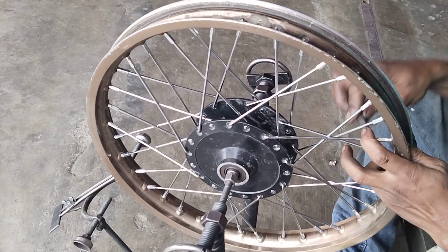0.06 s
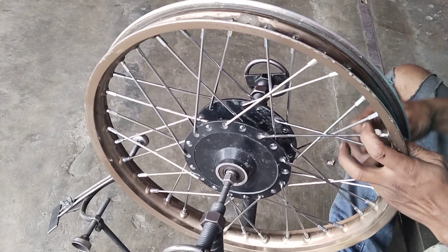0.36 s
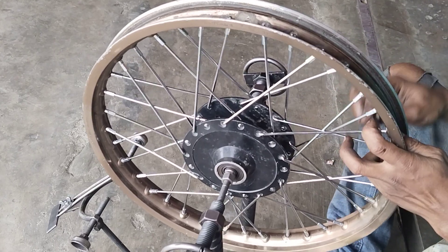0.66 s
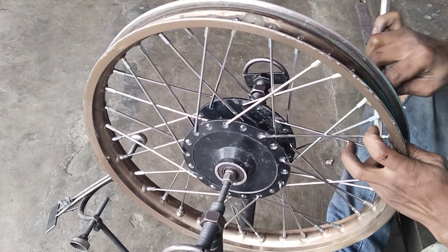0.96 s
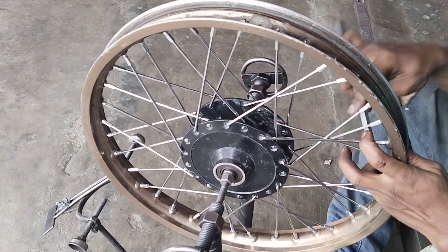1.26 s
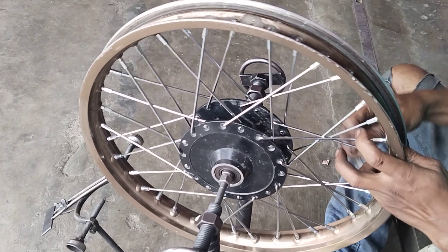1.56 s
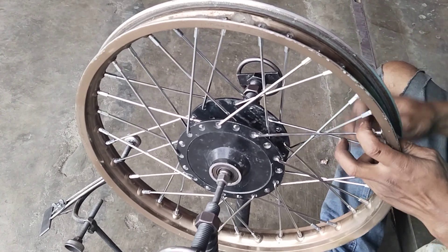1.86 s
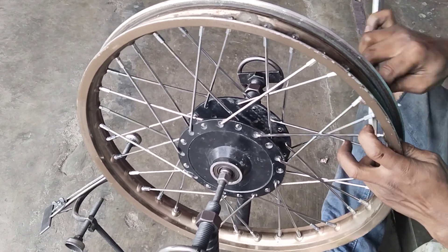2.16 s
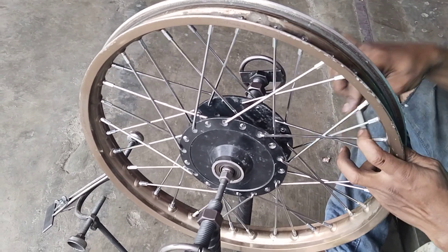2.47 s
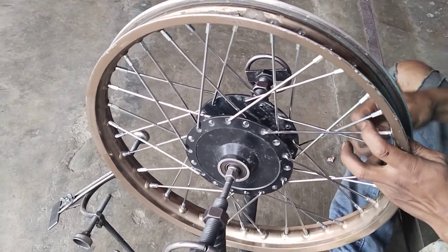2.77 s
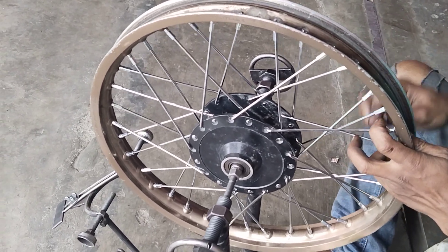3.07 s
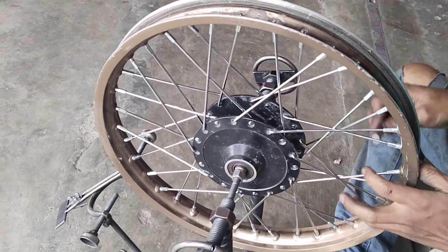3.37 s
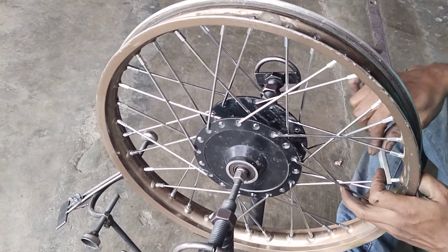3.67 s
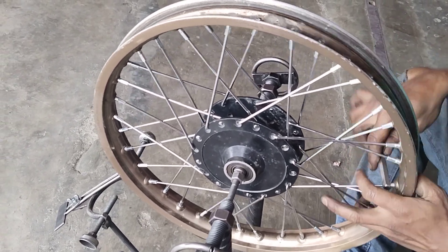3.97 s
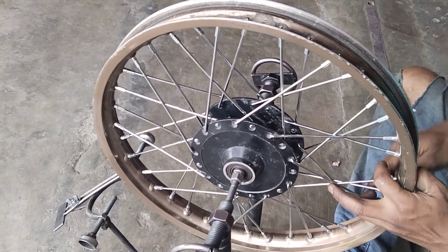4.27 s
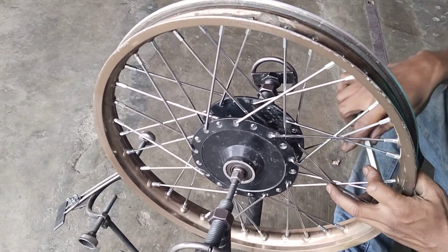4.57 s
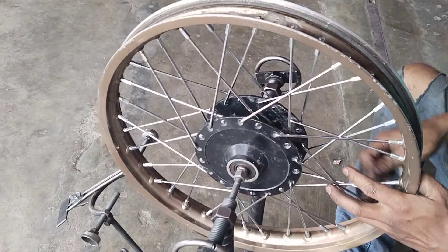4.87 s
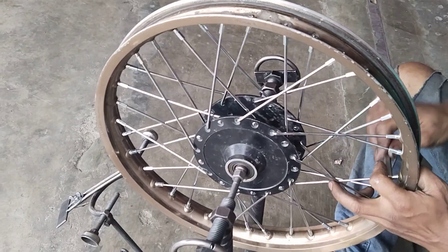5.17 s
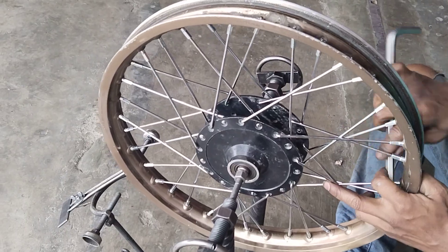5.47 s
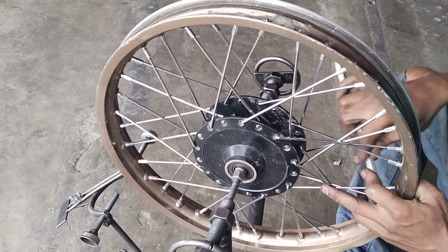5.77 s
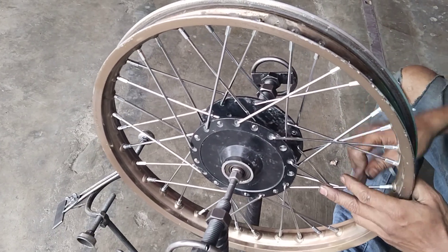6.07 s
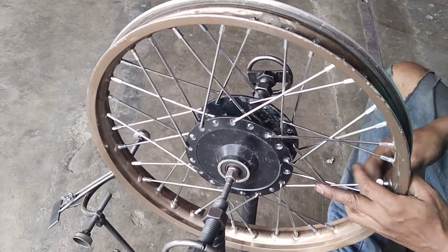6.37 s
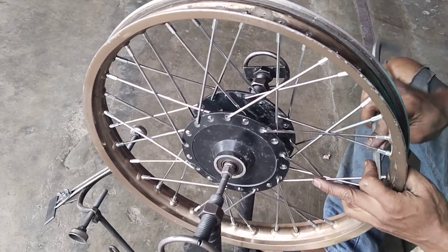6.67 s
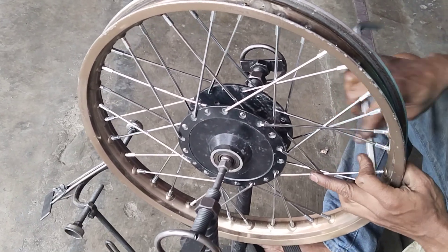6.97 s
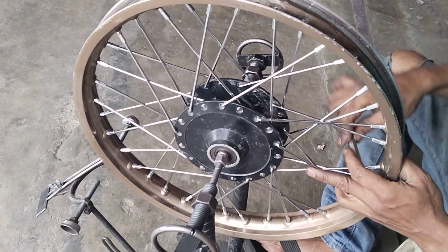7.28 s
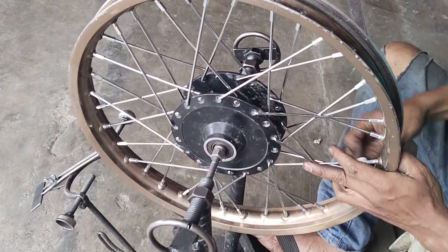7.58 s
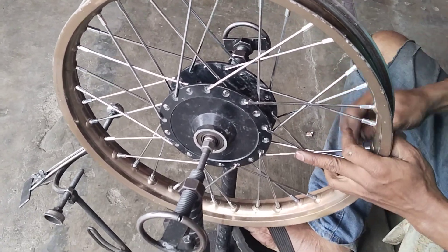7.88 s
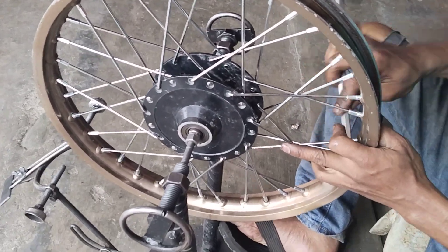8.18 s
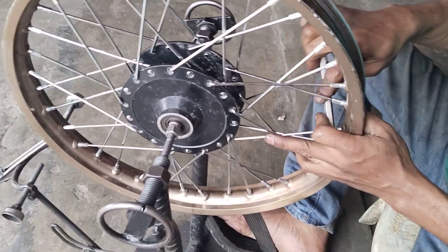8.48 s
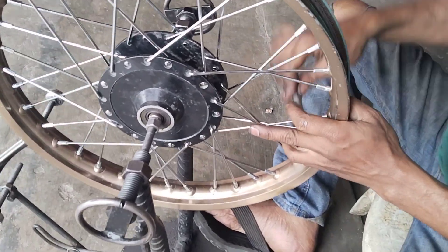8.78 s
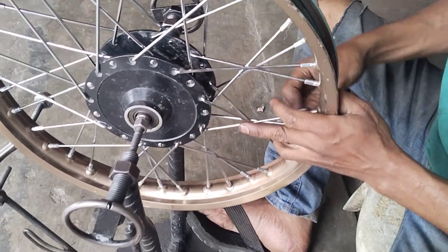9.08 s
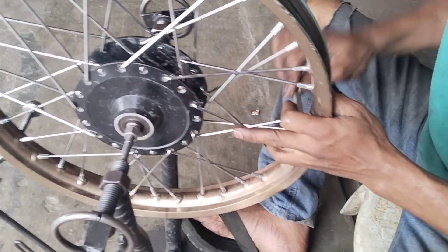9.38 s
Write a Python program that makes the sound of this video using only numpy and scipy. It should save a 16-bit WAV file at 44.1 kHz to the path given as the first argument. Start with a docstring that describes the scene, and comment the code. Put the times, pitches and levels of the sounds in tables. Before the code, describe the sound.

A small spanner clicks and scrapes on a spoked wheel in a quick, steady rhythm, ringing briefly over faint distant traffic.

```python
"""Short metallic clicks and scrapes, turn after turn: a small spanner tightens the spoke nipples of a
motorcycle wheel on a truing stand. It lands, seats and slides round; impact and stick-slip friction
excite the modes of spanner, spokes and rim, which ring briefly in a workshop with a concrete floor.
Hands shuffle on the wheel. Outside, traffic murmurs, a faint whine sinks, and two engines hum at
harmonics of their firing rates, one idling and one drawing nearer."""
import sys
import numpy as np
from scipy import signal
from scipy.fft import rfft, irfft, next_fast_len
from scipy.io import wavfile
from scipy.ndimage import uniform_filter1d

SR = 44100
rng = np.random.default_rng(int(sys.argv[2]) if len(sys.argv) > 2 else 0)


def inscribe(sig):
    """Save sig as 16-bit PCM at rate SR to the path in sys.argv[1].

    A 1-D sig is mono; a 2-D sig holds one channel per row.
    Samples are clipped to [-1, 1] before scaling.
    """
    pcm = np.round(np.clip(np.atleast_2d(sig).T, -1, 1) * 32767)
    wavfile.write(sys.argv[1], SR, pcm.astype(np.int16))


N = 415863
TIME = np.arange(N) / SR
MOVE_S = (3.2, 5.7)  # the spanner leaves the first nipple, and has settled on the second


def undb(db):
    """Amplitude ratio of a level in decibels."""
    return 10 ** (np.asarray(db) / 20)


def unit(x):
    """Normalisation to an rms of 1."""
    return x / np.sqrt(np.mean(x ** 2))


def curves(table):
    """Linear interpolation of each column over the times in the first."""
    times_s, *columns = np.transpose(table)
    return [np.interp(TIME, times_s, column) for column in columns]


def fade(t, t60):
    """Exponential free decay, 60 dB down after t60."""
    return np.exp(-np.log(1000) * t / t60)


def colour(x, points):
    """Minimum-phase filter through points of (frequency_hz, gain_db)."""
    size = 2 * next_fast_len(len(x))
    hz, db = np.transpose(points)
    grid_hz = np.maximum(np.fft.rfftfreq(size, 1 / SR), 1)
    gain = undb(np.interp(np.log(grid_hz), np.log(hz), db))
    cepstrum = irfft(np.log(gain))
    cepstrum[1:size // 2] *= 2  # folding the cepstrum makes the filter causal
    cepstrum[size // 2 + 1:] = 0
    return irfft(rfft(x, size) * np.exp(rfft(cepstrum)))[:len(x)]


def noise(points, size):
    """Spectrally shaped Gaussian noise of rms 1."""
    return unit(colour(rng.standard_normal(size), points))


def walk(rate_hz):
    """Slow random modulation of rms 1."""
    hold = int(SR / rate_hz)
    steps = np.repeat(rng.standard_normal(N // hold + 1), hold)
    return unit(uniform_filter1d(steps, hold)[:N])


def add(out, start_s, x):
    """Superposition of x on out from start_s."""
    i = max(int(start_s * SR), 0)
    out[i:i + len(x)] += x[:max(N - i, 0)]


def drone(centre_hz, db, width_hz):
    """Quadrature modulation makes a gliding noise band: a rush when wide, a whine when narrow."""
    phase = 2 * np.pi * np.cumsum(centre_hz) / SR
    lowpass = signal.butter(2, width_hz / 2, fs=SR, output="sos")
    in_phase, quadrature = signal.sosfilt(lowpass, rng.standard_normal((2, N)))
    return undb(db) * unit(in_phase * np.cos(phase) + quadrature * np.sin(phase))


def street(flicker_db=1):
    """Traffic sums incoherently to broadband noise; rumble, murmur and hiss swell independently."""
    # traffic spectrum: frequency_hz, gain_db
    spectrum = [(25, -16.5), (60, -3), (90, -8), (150, -2.5), (220, -10), (360, -6.5), (500, -13),
                (700, -15.5), (1300, -19.5), (2000, -18.5), (3800, -24.5), (6000, -29.5), (9500, -38)]
    # band levels: time_s, rumble_db, murmur_db, hiss_db
    levels = [(0, -52, -55, -52.5), (0.6, -58.5, -57.5, -59), (1.8, -57.5, -57.5, -56.5),
              (2.5, -57, -58, -58.5), (3.6, -56, -60.5, -59), (5.3, -57.5, -57, -58.5),
              (8.4, -55.5, -54.5, -55.5), (9.43, -55, -52, -51.5)]
    out = 0
    for band_hz, db in zip([(25, 170), (210, 900), (1200, 16000)], curves(levels)):
        bandpass = signal.butter(3, band_hz, "bandpass", fs=SR, output="sos")
        band = signal.sosfilt(bandpass, noise(spectrum, N))
        out = out + unit(band) * undb(db + flicker_db * walk(10))
    return out


def tyres():
    """Rolling noise of distant tyres: one broad band that drifts in frequency and level."""
    # course of the band: time_s, centre_hz, level_db
    course = [(0, 1316, -62), (2.6, 943, -60.5), (4.5, 861.4, -56.5), (6.2, 1227, -62.5), (8, 1261, -62),
              (9.43, 1103, -55)]
    return drone(*curves(course), width_hz=464)


def whines(attack_s=0.04):
    """Narrow-band noise is heard as a thin, unsteady, far-off tone that sinks as it decays."""
    # falling tones: start_s, pitch_hz, sag_hz_per_s, level_db, t60_s
    glides = [(3.4, 1735, 99.8, -66, 18), (5.48, 1912, 270, -55.5, 3.5)]
    out = np.zeros(N)
    onset = 1 - np.exp(-TIME / attack_s)
    for start_s, pitch_hz, sag, db, t60 in glides:
        tone = drone(pitch_hz - sag * TIME, db, width_hz=30)
        add(out, start_s, tone * onset * fade(TIME, t60))
    return out


def engine(firing_hz, db, orders, wobble, flutter_db=2.5, boom_db=0, boom_hz=174, boom_width_hz=38):
    """Periodic firing gives a harmonic series; its low orders carry indoors and boom near a resonance."""
    phase = 2 * np.pi * np.cumsum(firing_hz * (1 + wobble * walk(9))) / SR
    hum = 0
    for order, order_db in orders:
        resonance_db = boom_db * np.exp(-((order * firing_hz - boom_hz) / boom_width_hz) ** 2)
        gain = undb(db + order_db + resonance_db + flutter_db * walk(6.5))
        hum = hum + gain * np.sin(order * phase + 2 * np.pi * rng.random())
    return np.sqrt(2) * hum


def idling_engine(firing_hz=29.3):
    """A low harmonic hum, frequency-modulated by the slightly uneven idle."""
    # loudness of the hum: time_s, level_db
    levels = [(0, -57.5), (1.8, -57), (2.6, -65.5), (5.6, -61), (7.2, -60.5), (8.2, -63), (9.43, -56.5)]
    # firing harmonics: order, relative_db
    orders = [(2, -11), (3, 2), (4, -1.5), (5, -8), (6, -7)]
    return engine(firing_hz, *curves(levels), orders, wobble=0.0148)


def approaching_engine(firing_hz=33.65):
    """The level rises as the distance shrinks, and the exhaust resonance booms under load."""
    # loudness of the approach: time_s, level_db
    levels = [(0, -68), (4.2, -68.5), (5.5, -60), (6.5, -57.5), (7.3, -58.5), (8.3, -53.5), (8.7, -58),
              (9, -52.5), (9.43, -52.5)]
    # firing harmonics: order, relative_db
    orders = [(2, -7), (3, -15), (4, -7.5), (5, 3.5), (6, 1), (7, -2), (8, -3.5), (9, -7), (10, -9.5),
              (11, -8), (12, -11)]
    # exhaust booms: centre_s, boost_db, half_width_s
    booms = [(7.7, 6.5, 0.11), (9.167, 9.5, 0.2)]
    boom_db = sum(db * np.exp(-((TIME - centre_s) / half_s) ** 2) for centre_s, db, half_s in booms)
    return engine(firing_hz, *curves(levels), orders, wobble=0.0061, boom_db=boom_db)


def shuffles():
    """Friction of skin and cloth: muffled noise bursts under Gaussian envelopes."""
    # the arm swings in and the hands shift their hold: centre_s, level_db, half_width_s
    rubs = [(0.071, -53.5, 0.022), (0.181, -49.5, 0.02), (0.566, -49, 0.021), (0.951, -46.5, 0.02),
            (1.354, -46.5, 0.023), (1.731, -49.5, 0.021), (2.553, -47.5, 0.018), (2.987, -49.5, 0.022),
            (3.796, -49, 0.028), (3.865, -39, 0.016), (5.088, -42.5, 0.0099), (5.506, -47.5, 0.038),
            (8.494, -42, 0.015)]
    spectrum = [(150, -39), (290, 1), (370, 0), (470, -3.5), (600, -18.5), (2000, -33), (8000, -40)]
    out = np.zeros(N)
    for centre_s, db, half_s in rubs:
        t = np.arange(-3 * half_s, 3 * half_s, 1 / SR)
        envelope = np.exp(-.5 * (t / half_s) ** 2)
        add(out, centre_s + t[0], undb(db) * noise(spectrum, len(t)) * envelope)
    return out


def room(x, wet_db=-11, low_t60=0.29, high_t60=0.34, build_s=0.01):
    """Reverberation: reflections from floor and walls build into a short, diffuse tail."""
    t = np.arange(SR) / SR
    low = noise([(2500, 10.5), (7000, -12.5)], SR) * fade(t, low_t60)
    high = noise([(2000, -7), (5000, -3)], SR) * fade(t, high_t60)
    tail = (low + 1.06 * high) * (1 - np.exp(-t / build_s))
    return x + undb(wet_db) * signal.fftconvolve(x, tail / np.linalg.norm(tail))[:N]


def wheel(time_s, ring_db, crack_db, crack_t60=0.026, dense_t60=0.13, scatter_db=2.2, damping=1.94):
    """Impulse response of the steel: a crack, a dense shimmer and modes weighted by the contact point."""
    # modes of spanner, spokes and rim:
    # pitch_hz, t60_before_damping_s, first_nipple_db, moving_on_db, second_nipple_db
    modes = [(1268, 0.35, -7.0, -18.0, -11.0), (1428, 0.15, -10.0, -12.0, -18.0),
             (1868, 0.25, -9.0, -23.0, -6.0), (2080, 0.15, -9.0, -15.0, -20.0),
             (2454, 0.4, -2.0, -8.0, -19.0), (2598, 0.25, -4.0, -6.0, -4.0),
             (2840, 0.15, -18.0, -3.0, -6.0), (3065, 0.15, -6.0, -13.0, -15.0),
             (3145, 0.22, 0.0, -3.0, -6.0), (3220, 0.15, -16.0, -7.0, -2.0),
             (3340, 0.15, -1.0, -10.0, -5.0), (3520, 0.15, -0.0, -15.0, 0.0),
             (3605, 0.15, -2.0, -5.0, -3.0), (3870, 0.15, -4.0, -3.0, -4.0), (4021, 0.15, -4.0, -9.0, -4.0),
             (4145, 0.15, -5.0, -11.0, -1.0), (4500, 0.15, -11.0, -15.0, -0.0),
             (4630, 0.22, -0.0, -5.0, -1.0), (4873, 0.3, -2.0, -4.0, -4.0),
             (5160, 0.11, -20.0, -11.0, -10.0), (5442, 0.11, -25.0, -3.0, -15.0),
             (5675, 0.2, -10.0, -4.0, -6.0), (6425, 0.11, -10.0, -2.0, -6.0), (6602, 0.18, -7.0, 0.0, -6.0),
             (7180, 0.11, -10.0, -15.0, -11.0), (7515, 0.11, -10.0, -8.0, -11.0),
             (8320, 0.11, -16.0, -8.0, -10.0), (8807, 0.11, -19.0, -7.0, -15.0),
             (9450, 0.11, -12.0, -25.0, -10.0), (10480, 0.11, -21.0, -8.0, -20.0)]
    # spectrum of the wheel's dense, overlapping modes: frequency_hz, gain_db
    dense_spectrum = [(300, -39.5), (800, -25), (1300, -16.5), (2100, -12), (3200, -4.5), (4000, -4),
                      (5200, -9.5), (6100, -10.5), (7200, -12), (9400, -12.5), (10500, -23.5)]
    t = np.arange(SR // 3) / SR
    hz, t60, *places_db = np.transpose(modes)
    mode_db = places_db[np.searchsorted(MOVE_S, time_s)] + scatter_db * rng.standard_normal(len(hz))
    # grip and tension detune the steel a little, at random for each blow
    hz = hz * (1 + .0028 * rng.standard_normal(len(hz)))
    phase = 2 * np.pi * (hz[:, None] * t + rng.random((len(hz), 1)))
    amplitudes = undb(mode_db) / np.sqrt(t60)  # mode_db sets energy, whatever the decay time
    ring = amplitudes @ (np.sin(phase) * fade(t, t60[:, None] / damping))
    envelope = fade(t, dense_t60) + undb(crack_db) * fade(t, crack_t60)
    dense = noise(dense_spectrum, len(t)) * envelope
    return unit(dense) + undb(ring_db) * unit(ring)


def click(time_s, db, bright_db, contact, bounce=0.74, chatter_scale_s=0.00053):
    """Impact with rebound: the spanner chatters in three tiny bounces; a clean contact cracks hardest."""
    low_db, mid_db, high_db, top_db, chatter_s = contact
    clean = np.exp(-chatter_s / chatter_scale_s)  # 1 for a single contact, near 0 for long chatter
    blow = wheel(time_s, ring_db=-2.5, crack_db=-6 + 12 * clean)
    hit = blow.copy()
    for when, energy in rng.random((3, 2)):
        lag = SR // 1000 + int(2 * when * chatter_s * SR)
        hit[lag:] += bounce * (1 - clean) * np.sqrt(energy) * blow[:-lag]
    # brightness tilts the spectrum about 3 kHz
    low_db, high_db, top_db = low_db - bright_db, high_db + bright_db / 2, top_db + bright_db
    hit = colour(hit, [(600, 1.5 + low_db / 2), (1700, low_db - 1), (3000, 0), (4400, mid_db),
                       (6500, high_db + 0.36), (9300, top_db + 0.36)])
    attack = hit[:int(.015 * SR)]
    return undb(db) * hit / np.std(attack)


def scrape(time_s, db, half_s, bright_db, slips_per_s=520):
    """Stick-slip friction: uneven impulses swell and fade as the jaws slide; their grip damps the ring."""
    t = np.arange(-2 * half_s, 2 * half_s, 1 / SR)
    gaps, sizes = rng.uniform(.4, 1.6, (2, 80))
    slip_samples = (np.cumsum(gaps) * SR / slips_per_s).astype(int)
    slips = np.bincount(slip_samples, sizes ** 2, len(t))[:len(t)]
    gripped = wheel(time_s, ring_db=-4, crack_db=0, dense_t60=0.14, damping=3.2)
    rub = signal.fftconvolve(slips * np.exp(-(t / half_s) ** 2), gripped)
    rub = colour(rub, [(600, -0.5), (1500, 4 - bright_db / 2), (3200, 0.54), (5500, bright_db / 2 - 3)])
    peak_power = uniform_filter1d(rub ** 2, len(t) // 2).max()
    return undb(db) * rub / np.sqrt(peak_power)


def knocks(tone_db=(-1.5, 0, 0, 0)):
    """Stray impacts: the loose spanner bumps into spokes and rim."""
    # it grazes, lifts off, rebounds or moves on: start_s, level_db, brightness_db, chatter_s
    bumps = [(0.545, -44.5, 2, 0.0028), (0.812, -41.5, 1, 0.001), (0.9175, -38.5, -0.5, 0.0026),
             (1.3106, -40.5, -1, 0.0029), (1.361, -45.5, 0, 0.0006), (1.7305, -46.5, 1, 0.0024),
             (2.0053, -43.5, -1, 0.0005), (2.4074, -42, 2, 0.00055), (2.811, -46.5, -3, 0.00044),
             (2.9938, -46, 4, 0.0036), (3.009, -41.5, 4, 0.0022), (3.0293, -32, 5.5, 0.0035),
             (3.2412, -33.5, 1.5, 0.0057), (3.2457, -25.5, 5.5, 0.00057), (3.427, -34, 0, 0.00054),
             (3.697, -55, -4, 0.0028), (3.814, -49.5, -7, 0.0024), (3.877, -47, -3, 0.0027),
             (4.1283, -27, -3.5, 0.00042), (4.235, -42.5, 7, 0.0054), (4.243, -40, 6, 0.0004),
             (4.3568, -48.5, -1, 0.00049), (4.4128, -39.5, 2, 0.0031), (4.45, -39.5, 0, 0.0036),
             (4.496, -46, -8, 0.0036), (4.691, -51, 0, 0.0027), (5.109, -32.5, 3, 0.00082),
             (5.487, -34.5, 1, 0.0005), (5.853, -48, -1, 0.0027), (5.953, -48, 7, 0.0023),
             (6.261, -36.5, 1.5, 0.0013), (6.8, -32.5, -2.5, 0.00093), (6.9762, -52, 4, 0.0007),
             (7.047, -35, 2, 0.0017), (7.223, -40.5, -10, 0.0021), (7.477, -41, -1, 0.00067),
             (7.761, -41, -3, 0.0018), (7.8462, -43, 1, 0.00065), (8.291, -41.5, 1, 0.0059),
             (9.3215, -32, -1, 0.0012)]
    out = np.zeros(N)
    for start_s, db, bright_db, chatter_s in bumps:
        add(out, start_s, click(start_s, db, bright_db, (*tone_db, chatter_s)))
    return out


def turns(hunt_db=-53.5, hunt_half_s=0.009):
    """Impact and friction alternate: the jaws land, hunt for the flats, seat and slide round."""
    # turns of the spanner: land_s, land_db, land_brightness_db, seat_s, seat_db, seat_brightness_db,
    # slide_delay_s, slide_db, slide_half_width_s, slide_brightness_db
    strokes = [(0.2097, -32.5, 0, 0.3051, -29, 0, 0.030, -38, 0.013, -2.5),
               (0.5986, -31.5, 0.5, 0.6868, -29.5, -0.5, 0.047, -37.5, 0.014, -4),
               (0.9824, -31, 1, 1.0749, -31, -1, 0.041, -35.5, 0.015, 1),
               (1.3834, -31, 0.5, 1.4931, -29.5, 1.5, 0.031, -38.5, 0.013, 1),
               (1.777, -31.5, 0.5, 1.886, -29, -2, 0.045, -37.5, 0.015, 0.5),
               (2.1859, -31, 1, 2.2932, -29, -2, 0.043, -39, 0.013, -2),
               (2.589, -32.5, -1, 2.696, -28, -2, 0.042, -39, 0.017, -6.5),
               (4.7108, -31, 7, 4.8514, -32, 1, 0.027, -40, 0.0073, 11),
               (5.071, -31, -1.5, 5.2493, -35, 1, 0.035, -38, 0.012, 11),
               (5.45, -28.5, -3, 5.6192, -38, -0.5, 0.031, -52, 0.012, -4),
               (5.8734, -36, 3.5, 5.9881, -33.5, 0.5, 0.067, -41.5, 0.021, 5),
               (6.2212, -34, -1, 6.3818, -31.5, -2.5, 0.035, -37.5, 0.013, -3),
               (6.6543, -35, 0, 6.7488, -27, -0.5, 0.081, -37, 0.0078, -8),
               (7.0078, -36.5, 6, 7.1399, -32.5, -0.5, 0.046, -44, 0.014, -3),
               (7.42, -33, 0, 7.517, -29.5, -1.5, 0.038, -37.5, 0.013, 2),
               (7.781, -31.5, -1, 7.883, -28.5, -2, 0.034, -36, 0.013, -2),
               (8.169, -32, -1, 8.2314, -30, -1, 0.027, -48, 0.008, -5),
               (8.534, -32, -2, 8.631, -28, 0.5, 0.048, -39, 0.014, -2),
               (8.9236, -32, -2, 9.0117, -26.5, -1, 0.064, -33.5, 0.023, 9)]
    # contact as the jaws land, one row a nipple: low_db, mid_db, high_db, top_db, chatter_s
    landing = [(-2, -3.5, -5, -0.7, 0.0026), (1.5, 1, 0.5, 2, 0.0006)]
    # contact as they seat, one row a nipple: low_db, mid_db, high_db, top_db, chatter_s
    seating = [(-0.091, 4.5, 4.5, 5.5, 0.0016), (-1.2, 0, -0.5, 0.5, 0.0018)]
    out = np.zeros(N)
    for land_s, land_db, land_bright, seat_s, seat_db, seat_bright, *slide in strokes:
        delay_s, slide_db, half_s, slide_bright = slide
        nipple = int(land_s > MOVE_S[0])
        midway_s = (land_s + seat_s) / 2
        add(out, land_s, click(land_s, land_db, land_bright, landing[nipple]))
        add(out, midway_s - 2 * hunt_half_s, scrape(land_s, hunt_db, hunt_half_s, bright_db=0))
        add(out, seat_s, click(seat_s, seat_db, seat_bright, seating[nipple]))
        add(out, seat_s + delay_s - 2 * half_s, scrape(seat_s, slide_db, half_s, slide_bright))
    return out


def scene():
    """Superposition in one channel: the street, the hands and the reverberant work on the wheel."""
    outside = idling_engine() + approaching_engine() + street() + tyres() + whines()
    spanner = room(turns() + knocks())
    return (outside + spanner + shuffles())[None]


def record(dry, cutoff_hz=10700, sizzle_db=-24, limit_hz=15300):
    """Band limiting: the treble falls steeply above cutoff_hz; a faint sizzle remains up to limit_hz."""
    treble_cut = signal.ellip(10, .2, 70, cutoff_hz, fs=SR, output="sos")
    band_limit = signal.ellip(8, .2, 70, limit_hz, fs=SR, output="sos")
    passed = signal.sosfilt(treble_cut, dry) + undb(sizzle_db) * dry
    return signal.sosfilt(band_limit, passed)


dry = scene()
out = record(dry)
inscribe(out)
```